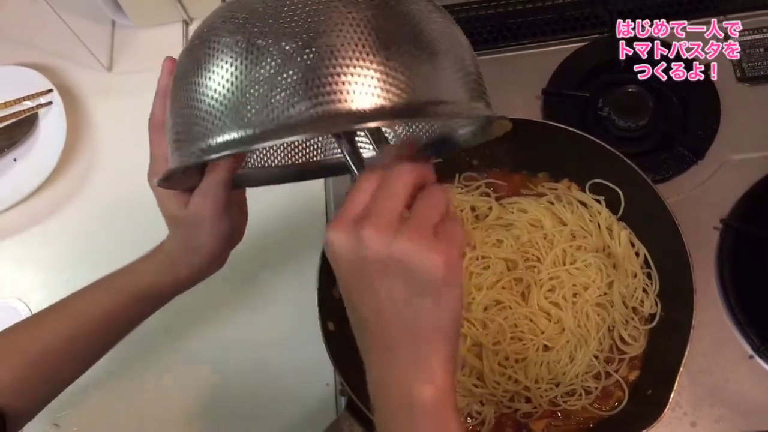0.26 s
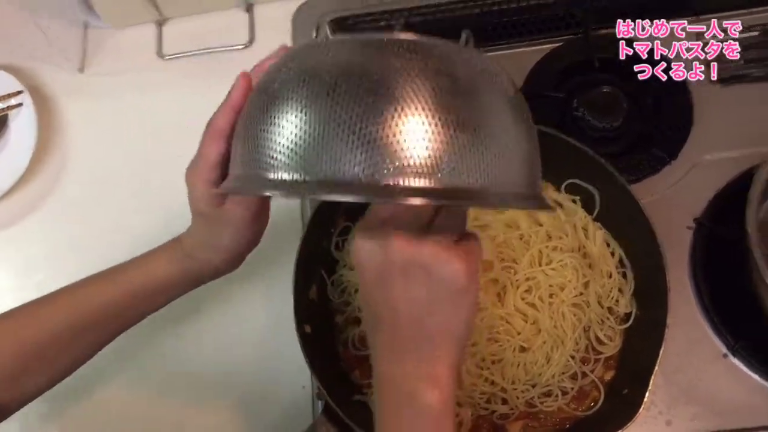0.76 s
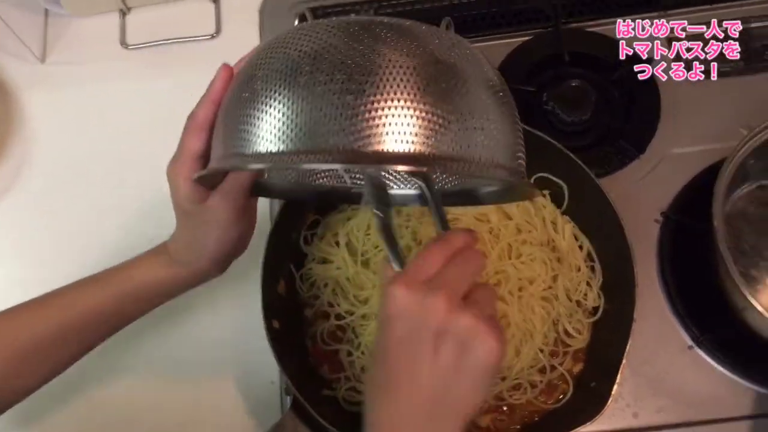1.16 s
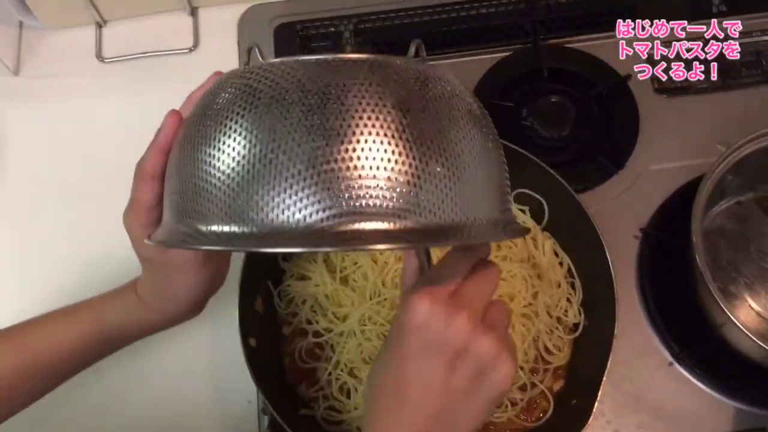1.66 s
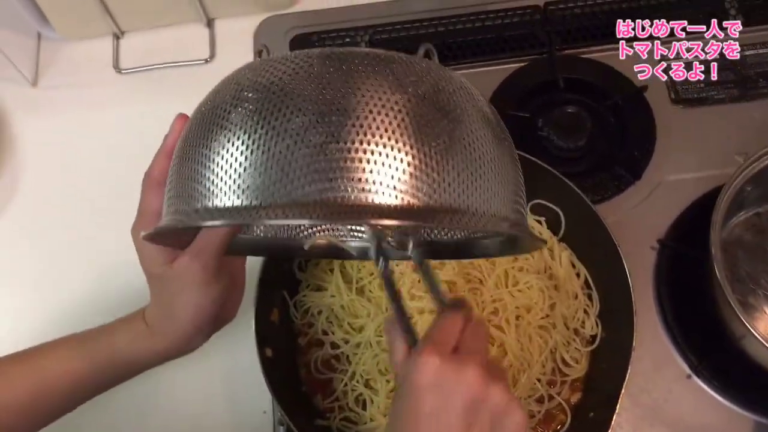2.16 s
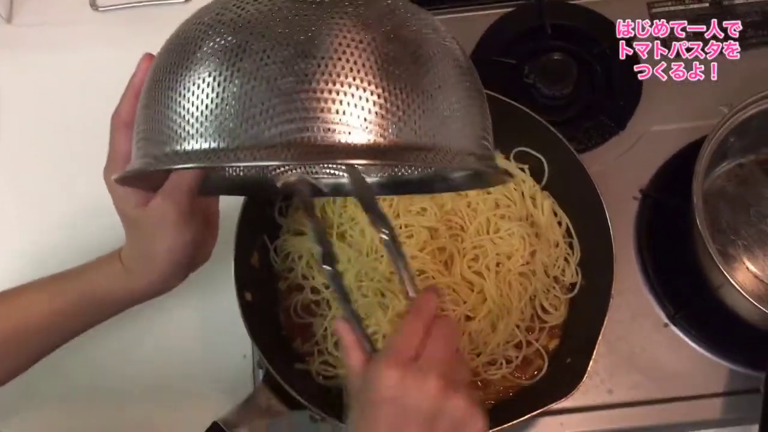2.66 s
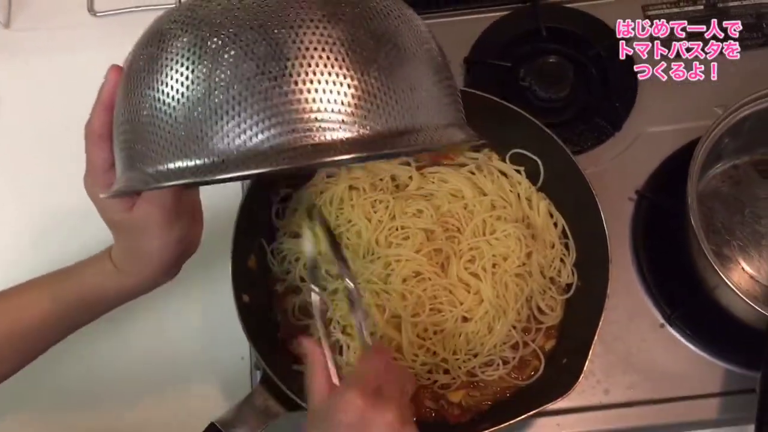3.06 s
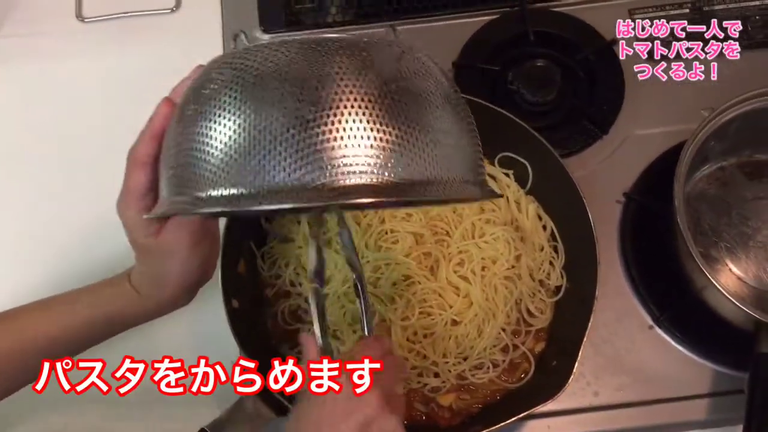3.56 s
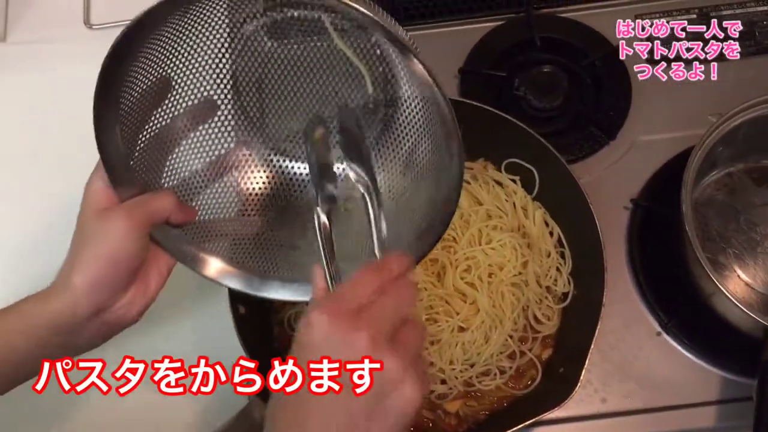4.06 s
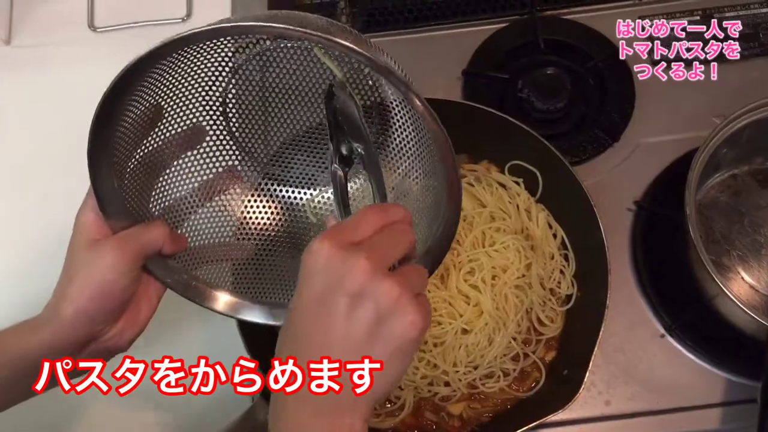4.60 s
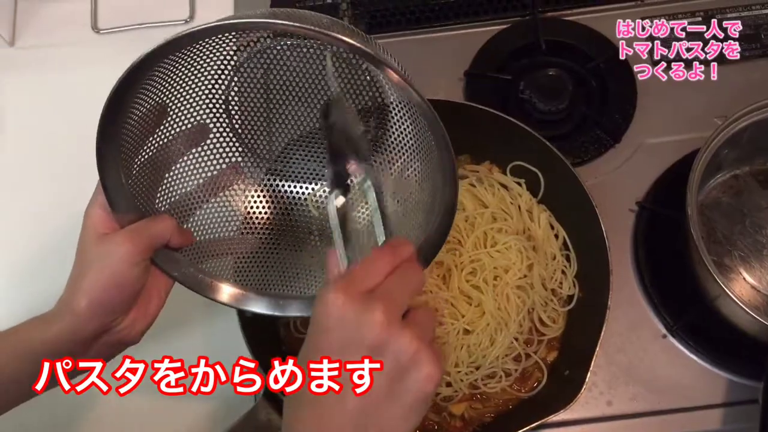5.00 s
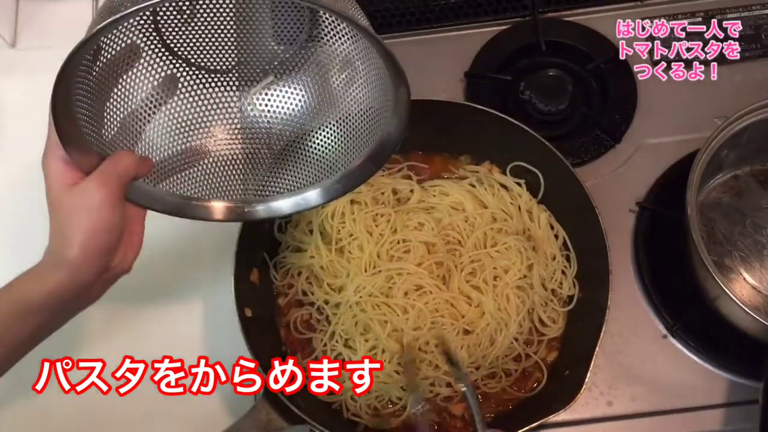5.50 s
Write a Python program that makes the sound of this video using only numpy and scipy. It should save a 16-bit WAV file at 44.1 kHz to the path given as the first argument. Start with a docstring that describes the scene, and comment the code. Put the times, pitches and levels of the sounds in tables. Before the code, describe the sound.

Close up in a small hard-walled kitchen, steel tongs hit and drag across a perforated colander in quick irregular strokes, each a bright clack with a short grainy scrape. After about three and a half seconds the metal stops, leaving soft plops, tiny wet ticks and a faint sliding swish of pasta. Sharp tong clacks return at the end. A deep fan drone and low simmer hiss continue throughout.

```python
"""Steel tongs strike and drag across the perforated wall of a hand-held colander, stroke after stroke, then clack.
Noise pushed by the tips rings damped modes of the steel; shaped noise makes wet ticks, plops and a sliding strand.
The colander bumps dully against the hand. A small kitchen with hard walls answers briefly behind these sounds.
A deep fan drone and faint simmering hiss run throughout; one microphone above the stove."""
import sys
import numpy as np
from scipy import signal
from scipy.fft import rfft, irfft
from scipy.io import wavfile
from scipy.ndimage import uniform_filter1d

SR = 44100
rng = np.random.default_rng(int(sys.argv[2]) if len(sys.argv) > 2 else 0)


def int16_out(signal):
    """Quantize to a 16-bit WAV file."""
    q = np.round(np.clip(np.atleast_2d(signal).T, -1, 1) * 32767)
    wavfile.write(sys.argv[1], SR, q.astype(np.int16))


def voltage_ratio(level):
    """Linear amplitude factor for a level in decibels (scalar or array-like)."""
    return 10 ** (np.asarray(level, float) / 20)


N = 253134
T = np.arange(N) / SR
AIRBORNE_S = 4  # from here on the tongs clack clear of the wall


def unit(x):
    """Scale to rms 1."""
    return x / np.sqrt(np.mean(x ** 2))


def band(x, lo_hz, hi_hz):
    """Band-pass."""
    sos = signal.butter(3, [lo_hz, min(hi_hz, .45 * SR)], "bandpass", fs=SR, output="sos")
    return signal.sosfilt(sos, x)


def colour(x, points):
    """Shape a spectrum by (Hz, dB) points joined along log frequency."""
    hz, db = np.transpose(points)
    f = np.fft.rfftfreq(len(x), 1 / SR) + 1
    gain = voltage_ratio(np.interp(np.log(f), np.log(hz), db))
    return irfft(rfft(x) * gain, len(x))


def walk(rate):
    """Random levels held 1 / rate s and slewed twice; spread near 1."""
    hold = int(SR / rate)
    steps = np.repeat(rng.standard_normal(N // hold + 1), hold)
    return 1.39 * uniform_filter1d(uniform_filter1d(steps, hold), hold)[:N]


def ring(x, hz, t60, bend_hz=0.):
    """One decaying mode, its pitch optionally bent over time; white noise passes at unchanged power."""
    r = np.exp(-np.log(1000) / (max(t60, .005) * SR))
    turn = 1
    if np.ndim(bend_hz):
        turn = np.exp(2j * np.pi * np.cumsum(bend_hz) / SR)
    pole = r * np.exp(2j * np.pi * hz / SR)
    # a bent mode is a fixed one in a turning frame
    rung = signal.lfilter([2 * np.sqrt(1 - r)], [1, -pole], x / turn)
    return (rung * turn).imag


def tail(t60, size):
    """Decaying noise of unit energy."""
    h = rng.standard_normal(size) * np.exp(-np.log(1000) * np.arange(size) / (t60 * SR))
    return h / np.sqrt(np.sum(h ** 2))


def add(out, s, sound):
    """Mix a sound in at a time."""
    i = int(s * SR)
    out[..., i:i + sound.shape[-1]] += sound[..., :out.shape[-1] - i]


def peaks(times, db, rise, fall):
    """Gain that climbs to each peak and falls away at fixed dB per second."""
    late = T - np.array(times)[:, None]
    slope_db = np.where(late < 0, rise * late, -fall * late)
    return voltage_ratio((np.array(db)[:, None] + slope_db).max(axis=0))


# spectrum of the room air: pitch_hz [Hz], level_db [dB per Hz, relative]
AIR_SPECTRUM = [(42, -31), (72, 4), (139, -4), (171, -4.5), (295, -9), (323, -7.5), (465, -7.5),
                (545, -20.5), (624, -6.5), (716, -12), (878, -7.5), (2740, -18), (6350, -17.5),
                (15100, -34), (16500, -38)]
# lower edges of the octaves of hiss that each flicker: pitch_hz [Hz]
AIR_OCTAVES = 70, 140, 280, 560, 1120, 2240, 4480, 8960


def kitchen(fan_hz=49.2, fan_db=-51.8, air_db=-61):
    """A steady fan tone over hiss; each octave flickers, and all share the sauce's crackle, strongest in the treble."""
    drone = np.sqrt(2) * voltage_ratio(fan_db + 1.2 * walk(9.9)) * np.sin(2 * np.pi * fan_hz * T)
    hiss = colour(rng.standard_normal(N), AIR_SPECTRUM)
    crackle_db = 1.74 * walk(100)
    air = 0
    for hz in AIR_OCTAVES:
        flicker_db = 1.66 * walk(20) + 0.88 * walk(3.036)
        flicker_db = flicker_db + min(hz / 2300.0, 1) * crackle_db
        air = air + voltage_ratio(flicker_db) * band(hiss, hz, 2 * hz)
    return drone + voltage_ratio(air_db) * unit(air)


# each drag over the holes: start_s [s], lift_s [s], start_db and lift_db [dB of drive], bowl_db [dB re drive],
# then the favoured pitch at either end: start_hz, lift_hz [Hz]
DRAG_STROKES = [(0.0, 0.037, -43.5, -48, -12, 4500, 3540), (0.076, 0.152, -36, -40, -2.5, 3550, 3700),
                (0.382, 0.424, -36, -38.5, -17.5, 4260, 4270),
                (0.457, 0.576, -29.5, -38, -10.5, 3630, 3430), (0.766, 0.813, -34, -44.5, -26, 4360, 4000),
                (0.824, 0.953, -39, -28, -8.5, 5550, 3550), (1.394, 1.481, -41.5, -33, -5, 5070, 4250),
                (1.715, 1.757, -52, -41, -10, 4500, 4400), (1.766, 1.864, -38, -43, -9, 4400, 5600),
                (2.157, 2.257, -50.5, -35.5, -6.5, 4400, 3600), (2.514, 2.599, -41.5, -33, -7, 3900, 4850),
                (2.88, 2.988, -41, -42, -12.5, 4500, 5000), (3.316, 3.45, -42.5, -36.5, -4.5, 4500, 4940)]


def drag_force(chatter_db=3.5, release_db_per_s=647, dulling_db_per_s=190, bright_db=-0.9):
    """Force of the dragging tips as it reaches the low, middle and high modes: uneven, snagging noise."""
    db = np.full((3, N), -120.)
    for start, lift, start_db, lift_db, bowl_db, _, _ in DRAG_STROKES:
        after = np.maximum(T - lift, 0)
        level_db = np.interp(T, [start, lift], [start_db, lift_db]) - release_db_per_s * after
        # after lift-off bowl and treble die faster than the middle
        dull_db = -dulling_db_per_s * after
        shares = level_db + np.array([bowl_db + dull_db, 0 * T, bright_db + dull_db])
        db = np.where(T >= start, np.maximum(db, shares), db)
    # dense noise stands for clicks of random size; the grip stutters
    clicks = rng.standard_normal(N) * voltage_ratio(chatter_db * walk(900) + 0.59 * walk(150))
    # tips snag on hole edges 130 times a second on average, each catch fading over 3.2 ms
    snags = (rng.random(N) < 130 / SR) * rng.exponential(size=N)
    catches = signal.lfilter([1], [1, -np.exp(-1 / (0.0032 * SR))], snags)
    clicks = clicks * (1 + voltage_ratio(-6.5) * catches)
    return unit(clicks) * uniform_filter1d(voltage_ratio(db), size=128)


def favoured_hz(clack_hz=4500):
    """The pitch that the place of contact favours slides along each stroke; clacks in the air have their own."""
    rows = np.array(DRAG_STROKES)
    sliding = np.interp(T, rows[:, :2].ravel(), rows[:, 5:].ravel())
    return np.where(T < AIRBORNE_S, sliding, clack_hz)


# tong tips landing or catching: start_s [s], peak_db and ring_db [dB of drive],
# bowl_db and bright_db [dB re the middle modes]
LANDINGS = [(0.0658, -20, -41, -8, -6), (0.088, -32, -46, -4, -8), (0.1135, -32, -38.5, -12, -9.5),
            (0.1469, -33, -46, -10, -16), (0.375, -28, -40, -21, -2.5), (0.4523, -22.5, -41, -2.5, 0.5),
            (0.4612, -33, -34, 2.5, 2), (0.5063, -25.5, -36, -1.5, 1), (0.76, -28.5, -37.5, -32, -3),
            (0.8259, -36, -38.5, -11, -8), (0.8694, -34.5, -41, 3, -12), (0.916, -22, -34.5, -5, -15),
            (0.9374, -29, -46, -21, -14), (1.3816, -18, -27, -32, -2.5), (1.4089, -21.5, -46, -3, -3),
            (1.4391, -39, -35.5, 1, -10), (1.4854, -17.5, -37.5, -14.5, -8),
            (1.703, -30.5, -45.5, -9, -0.5), (1.7697, -43, -51, -7, -15), (1.795, -37.5, -55, 1, -10),
            (1.848, -42, -62, 0.5, 0), (2.145, -26, -41, -12, -3.5), (2.195, -33.5, -62, -3.5, -1),
            (2.226, -46, -48, -14, 0), (2.2381, -27.5, -50, -3, -5), (2.253, -25.5, -50, -12, -12),
            (2.5008, -30, -48, -7, -1), (2.5049, -24.5, -45, -9.5, -3.5), (2.5375, -30, -45, -6, -8),
            (2.578, -20, -39, -12.5, -15), (2.594, -27, -37, -12, -6), (2.8789, -21, -38, -28, -2.5),
            (2.903, -17.5, -46, -14.5, -9), (2.9378, -27.5, -40, -7.5, -0.5), (2.9711, -23, -52, -10.5, 4),
            (3.3039, -16.5, -54, -8, -2), (3.3496, -41, -48, 1, -13), (3.3743, -31.5, -43, -5.5, -0.5),
            (3.4017, -30, -41, -9, 0), (3.4295, -29, -49.5, -9, -2), (3.4535, -24.5, -42.5, -17, -3),
            (5.4423, -38, -56, -28, -1), (5.451, -42.5, -61, -30, -5), (5.542, -15, -28, -53, -3.5),
            (5.6539, -36, -47.5, -32, 7.5), (5.7105, -21.5, -41.5, -44, -3.5)]


def landing_force(rattle_s=0.0024, linger_s=0.023):
    """Force of the landing tips on low, middle and high modes: noise with a sharp and a lingering decay."""
    blows = np.zeros((3, N))
    t = np.arange(4096) / SR
    for s, peak_db, ring_db, bowl_db, bright_db in LANDINGS:
        # a sharp landing, then the two arms of the tongs buzz on against each other
        shape = voltage_ratio(peak_db) * np.exp(-t / rattle_s) + voltage_ratio(ring_db) * np.exp(-t / linger_s)
        shares = voltage_ratio(np.array([[bowl_db], [0], [bright_db]]))
        add(blows, s, shares * rng.standard_normal(4096) * shape)
    return blows


# modes of tongs and wall: pitch_hz [Hz], level_db [dB, relative], t60_s [s, before hand damping]
STEEL_MODES = [(2900, -12.5, 0.27), (3284, -2.5, 0.043), (3363, -6.5, 0.14), (3550, -2, 0.059),
               (3790, -12.5, 0.18), (4085, -6, 0.15), (4265, -5.5, 0.14), (4900, -14, 0.24),
               (5480, -7, 0.22), (5620, -7, 0.1), (6530, 1, 0.059), (6730, -2, 0.1), (8274, -1.5, 0.067),
               (9290, -1.5, 0.066), (9800, -25, 0.1), (11390, -4, 0.049), (11660, -15, 0.057)]
# modes of the bowl: pitch_hz [Hz], level_db [dB, relative], t60_s [s, before hand damping]
BOWL_MODES = [(642, 0, 0.049), (850, 4.5, 0.11), (1040, -28, .05), (1327, 11.5, 0.084), (1440, -16, 0.017),
              (1844, 4.5, 0.091), (2220, 4, 0.091), (2373, 11, 0.077)]
# colour of the crowded sheet modes: pitch_hz [Hz], level_db [dB per Hz, relative]
SHEET_SPECTRUM = [(290, -61), (500, -38), (742, -22), (822, -11), (1190, -18), (1310, -8.5), (2610, -10),
                  (3160, 1.5), (3880, -4), (9460, -1.5), (15100, -5), (16500, -63)]


def steel_wall(drags, blows, damping=0.43, bend=0.0123, wander_db=2.5, modes_db=-8.5, pressed_db=-3.5,
               sheet_db=-6.0, sheet_t60=0.02, patch_db=2.5, bite=0.56, favour_db=2.5, favour_octaves=0.23):
    """Distinct modes, favoured anew as the contact point moves, over a crowd of sheet modes too dense to count."""
    out = 0
    edges = (0, 2700, 7500, SR)  # borders between bowl, middle and bright modes, Hz
    grid, half_width = np.geomspace(600, 15800, 20), 1.09  # the crowd in quarter octaves: Hz, ratio
    crowd = colour(rng.standard_normal(N), SHEET_SPECTRUM)
    favoured = favoured_hz()

    def near_db(hz):
        """Modes close to the favoured pitch are driven harder."""
        return favour_db * np.exp(-(np.log2(hz / favoured) / favour_octaves) ** 2)

    r = np.exp(-2 * np.log(1000) / (sheet_t60 * SR))  # decay of power per sample
    for drag, blow, lo, hi in zip(drags, blows, edges, edges[1:]):
        modes = [m for m in BOWL_MODES + STEEL_MODES if lo <= m[0] < hi]
        norm = np.sqrt(sum(voltage_ratio(2 * db) for _, db, _ in modes))
        # tips pressed against the wall ring less freely than tips that bounce
        strike = blow + voltage_ratio(pressed_db) * drag
        push = blow + drag
        rung = 0
        for hz, db, t60 in modes:
            drive = strike * voltage_ratio(near_db(hz) + wander_db * walk(14))
            # grip and pressure detune the mode
            bend_hz = bend * hz * walk(5.5)
            rung = rung + voltage_ratio(db + modes_db) / norm * ring(drive, hz, damping * t60, bend_hz)
        out = out + band(rung, 0.74 * modes[0][0], 1.22 * modes[-1][0])
        # energy put into the sheet drains away; it sounds as noise whose colour shifts with the place of contact
        stored = np.sqrt(signal.lfilter([1 - r], [1, -r], push ** 2) + (bite * push) ** 2)
        centres = grid[(lo <= grid) & (grid < hi)]
        crowd_level = band(crowd, centres[0] / half_width, centres[-1] * half_width).std()
        shaken = stored * crowd / crowd_level
        for hz in centres:
            patch = voltage_ratio(sheet_db + near_db(hz) + patch_db * walk(20))
            out = out + patch * band(shaken, hz / half_width, hz * half_width)
    return out


def crack(blow):
    """The bare impact heard together with the onset of the ringing steel: the middle landing force, band-passed."""
    return voltage_ratio(-13.5) * band(blow, 2700, 13000)


# the loudest small wet ticks: start_s [s], peak_db [dB], pitch_hz [Hz]
LOUD_TICKS = [(0.2618, -55, 8170), (0.2794, -54, 7380), (0.6573, -53, 4720), (0.7397, -49, 6160),
              (2.0038, -55, 6890), (2.364, -56, 6080), (2.4116, -46, 6700), (3.7424, -55, 6260),
              (3.8127, -49.5, 6000), (3.9914, -51, 6440), (4.5453, -51, 4330), (5.03, -52, 4640),
              (5.3904, -47, 4320)]


def wet_ticks(faint_count=40, faint_db=-56.5, faint_hz=6000):
    """Short decaying noise in a band around each pitch; lesser ticks are scattered at random."""
    out, t = np.zeros(N), np.arange(8192) / SR
    when = rng.random(faint_count) * T[-1]
    size_db = faint_db + 2.4 * rng.standard_normal(faint_count)
    pitch_hz = faint_hz * np.exp(.22 * rng.standard_normal(faint_count))
    for s, db, hz in LOUD_TICKS + list(zip(when, size_db, pitch_hz)):
        burst = rng.standard_normal(8192) * np.exp(-t / 0.0069)
        tick = band(burst, 0.68 * hz, 1.27 * hz)
        add(out, s, voltage_ratio(db) * tick / np.abs(tick).max())
    return out


# the colander bumps against the hand: peak_s [s], level_db [dB]
HAND_BUMPS = [(0.732, -60), (0.794, -43), (0.865, -43)]


def thud(rise_db_per_s=520, fall_db_per_s=354):
    """A muffled, rough bump: fluctuating noise through one low mode and a broad low band."""
    rumble = rng.standard_normal(N) * voltage_ratio(1.5 * walk(80))
    body = unit(ring(rumble, 228, 0.027)) + 0.48 * unit(band(rumble, 73, 450))
    gain = peaks(*np.transpose(HAND_BUMPS), rise_db_per_s, fall_db_per_s)
    return unit(body) * uniform_filter1d(gain, size=512)


# soft plops of pasta and hand: time_s [s, 6 ms after onset], peak_db [dB], pitch_hz [Hz], t60_s [s]
SOFT_PLOPS = [(1.136, -49, 1070, 0.026), (2.837, -49, 540, 0.052), (2.849, -49.5, 675, 0.063),
              (3.096, -51, 614, 0.092), (3.2, -50.5, 222, 0.054), (3.61, -55, 914, 0.063),
              (3.805, -55.5, 670, 0.043), (3.989, -50.5, 870, 0.037), (4.165, -53.5, 128, 0.052),
              (4.281, -49, 905, 0.03), (4.285, -54.5, 396, 0.044), (4.465, -55, 218, .05),
              (4.655, -50, 340, 0.034), (4.652, -49, 864, 0.031), (4.978, -52.5, 884, 0.029),
              (5.681, -45.5, 903, 0.034)]


def plops():
    """A soft swelling push of noise rings one dull mode, with some of the push heard around it."""
    out, t = np.zeros(N), np.arange(8192) / SR
    for s, db, hz, t60 in SOFT_PLOPS:
        push = rng.standard_normal(8192) * t * np.exp(-t / 0.0081)
        plop = unit(ring(push, hz, t60)) + 0.24 * unit(band(push, 0.23 * hz, 1.43 * hz))
        add(out, s - .006, voltage_ratio(db) * plop / np.abs(plop).max())
    return out


# tugs at a strand stuck to the wall: peak_s [s], level_db [dB], pitch_hz [Hz, centre of a wandering pitch]
STRAND_TUGS = [(4.119, -61, 2677), (4.214, -52, 2350), (4.362, -53.5, 2680), (4.56, -62.5, 2380)]


def sliding_strand(rise_db_per_s=370, fall_db_per_s=187):
    """A broad swish that moves in pitch, low noise carried on a gliding tone, over band-passed rubbing."""
    s, db, hz = np.transpose(STRAND_TUGS)
    rub = rng.standard_normal(N) * voltage_ratio(1.8 * walk(150))
    glide_hz = np.interp(T, s, hz) * (1 + 0.13 * walk(30))
    swish = ring(rub, 120, .012) * np.sin(2 * np.pi * np.cumsum(glide_hz) / SR)
    wet = unit(swish) + 1.13 * unit(band(rub, 1200, 4200))
    return unit(wet) * peaks(s, db, rise_db_per_s, fall_db_per_s)


# arms ringing free in the air: pitch_hz [Hz], level_db [dB, relative], t60_s [s]
ARM_MODES = [(2980, -6, 0.18), (3190, -14, 0.19), (3730, -15, 0.21), (4200, -14, 0.12), (4420, -6, 0.068),
             (4960, -15, 0.21), (5459, -15, 0.21), (6600, -0.5, 0.075), (7240, -18, 0.19), (8522, -9, 0.11),
             (9700, -9, 0.11), (10030, -10, 0.093)]


def tongs(blow, level_db=-9.5):
    """The free arms ring on in their own modes after each clack."""
    blow = blow * (T >= AIRBORNE_S)
    rung = sum(voltage_ratio(db) * ring(blow, hz, t60) for hz, db, t60 in ARM_MODES)
    return voltage_ratio(level_db) * band(rung, 2800, 16500)


def scene(room_t60=0.19, room_db=-11):
    """Steel, pasta and bump in the room, over the kitchen air."""
    air = kitchen()
    drags, blows = drag_force(), landing_force()
    metal = steel_wall(drags, blows) + crack(blows[1]) + tongs(blows[1])
    # the steel is heard only from about 580 Hz up to 16 kHz
    near = band(metal, 580, 16000) + wet_ticks() + thud() + plops() + sliding_strand()
    # hard walls answer after a few ms with a short, slightly duller wash
    echo = band(np.pad(tail(room_t60, size=16384), (200, 0)), 400, 11500)
    room = voltage_ratio(room_db) * signal.fftconvolve(near, echo)[:N]
    return (near + room + air)[None]


def band_limit(x):
    """A steep low-pass at the top of the band."""
    return signal.sosfilt(signal.butter(12, 17000, fs=SR, output="sos"), x)


def record(dry):
    """The finished mix as it is kept."""
    return band_limit(dry)


dry = scene()
out = record(dry)
int16_out(out)
```